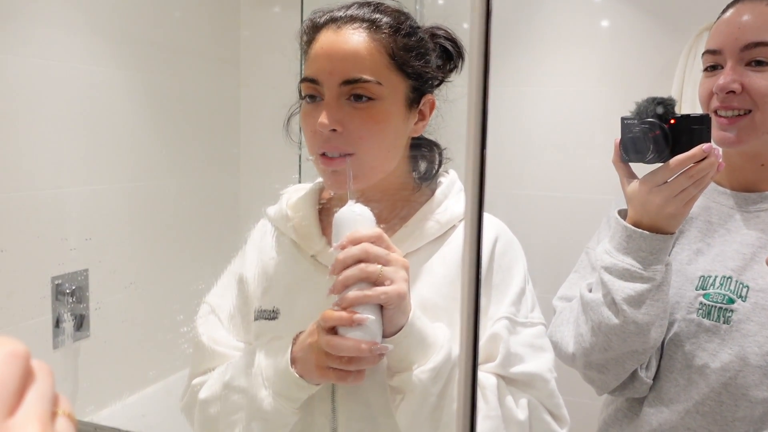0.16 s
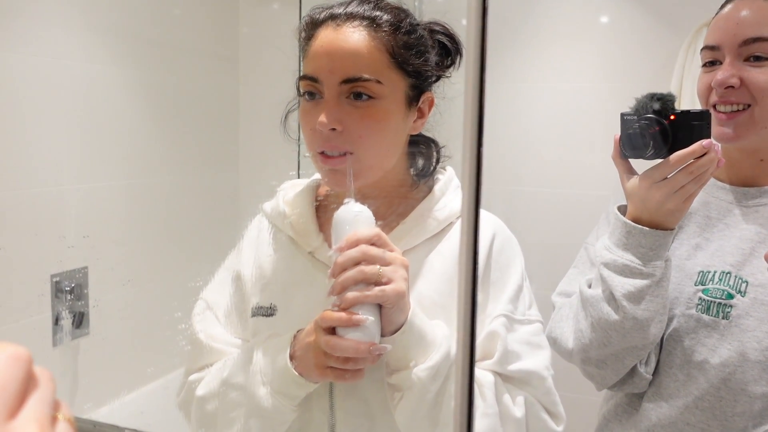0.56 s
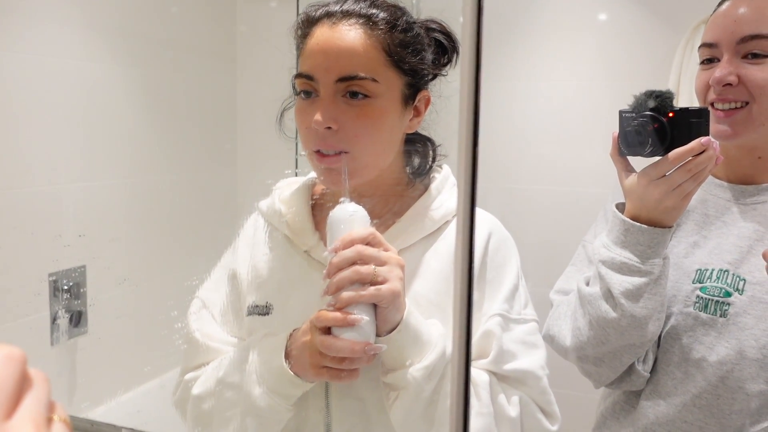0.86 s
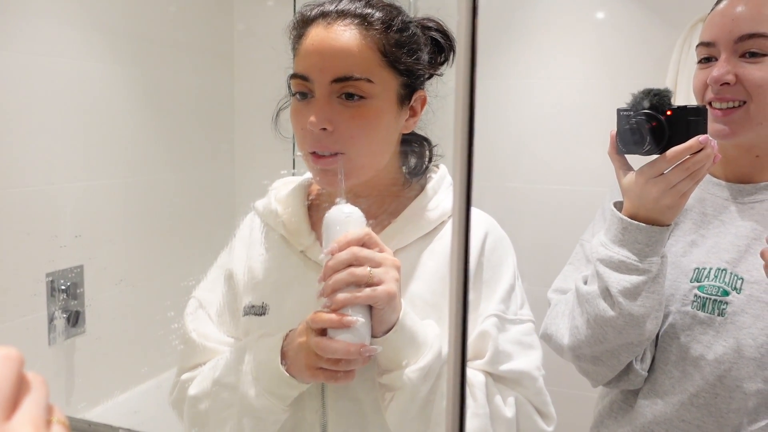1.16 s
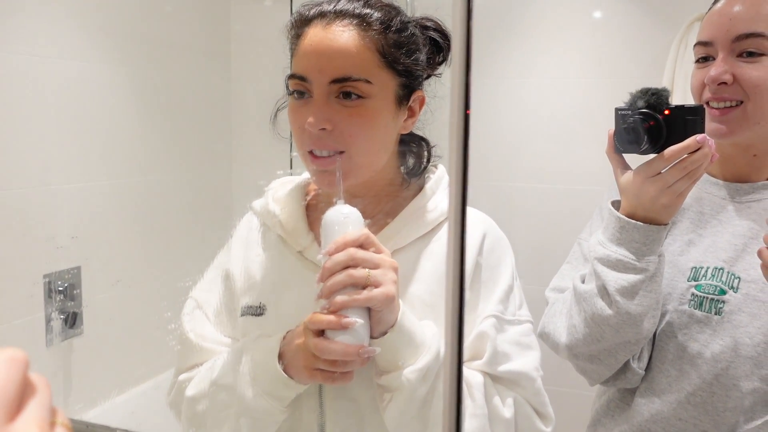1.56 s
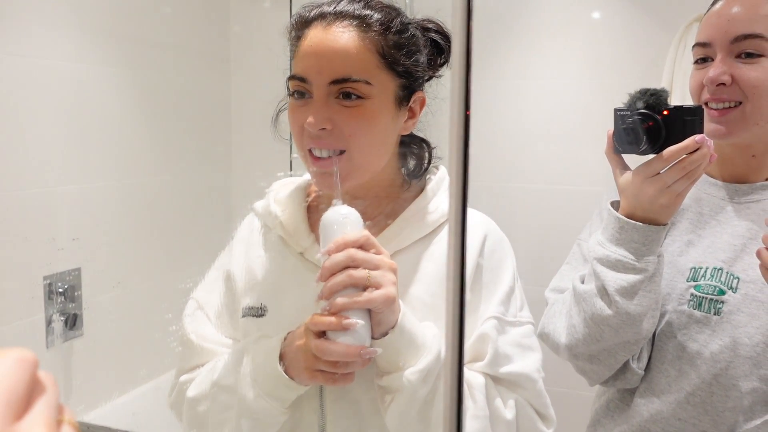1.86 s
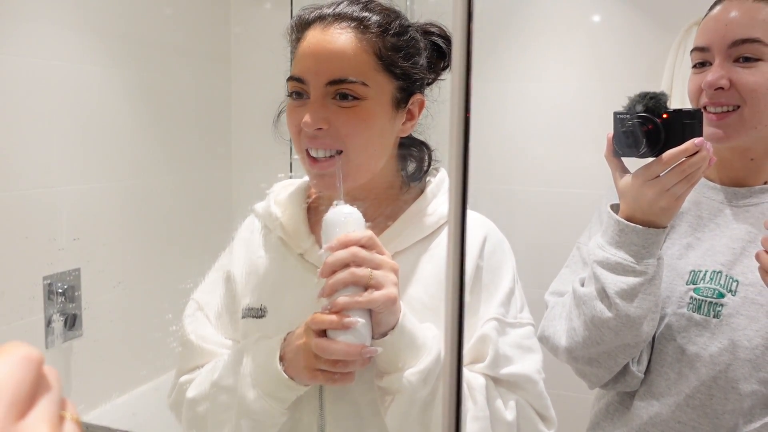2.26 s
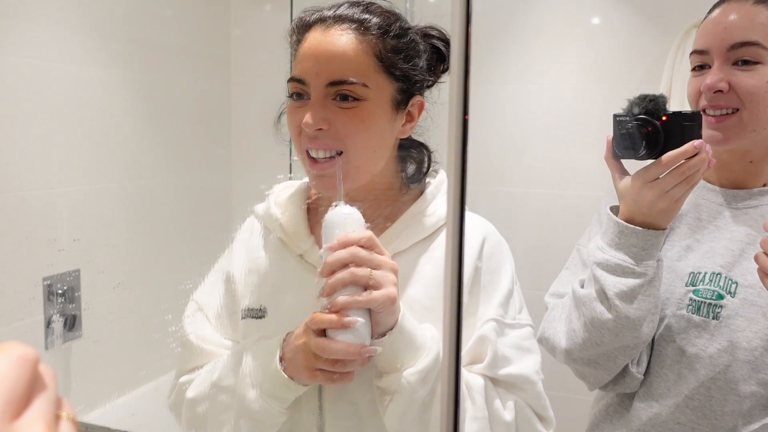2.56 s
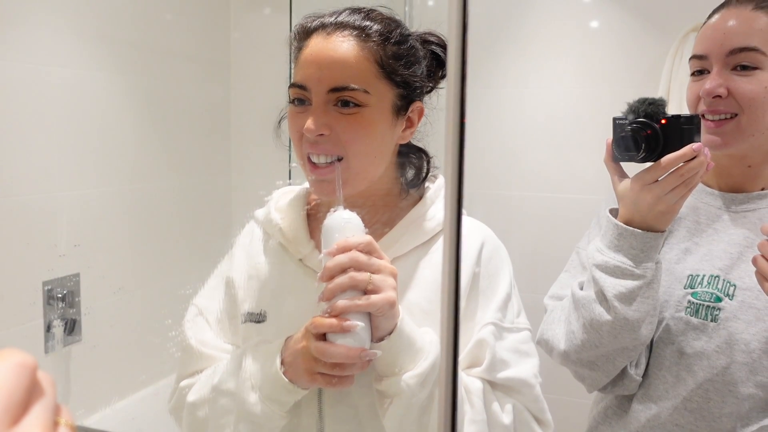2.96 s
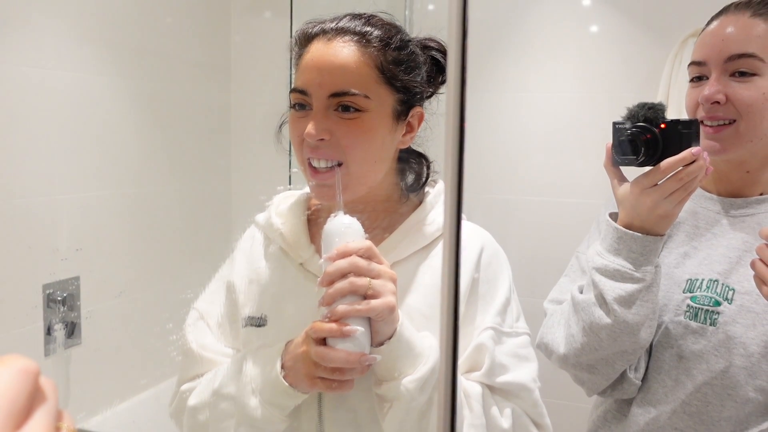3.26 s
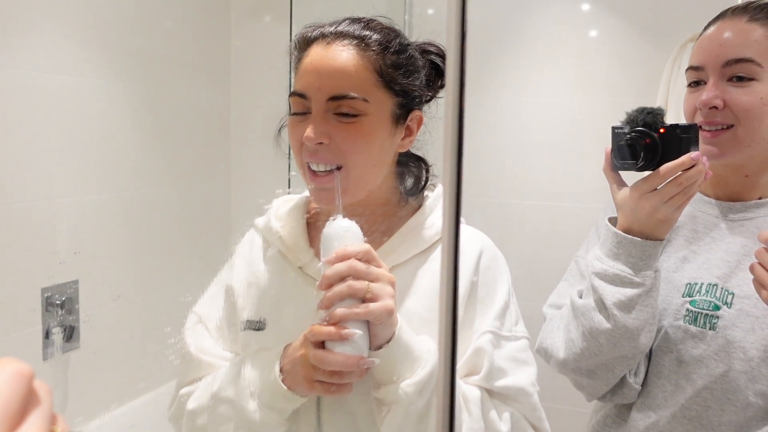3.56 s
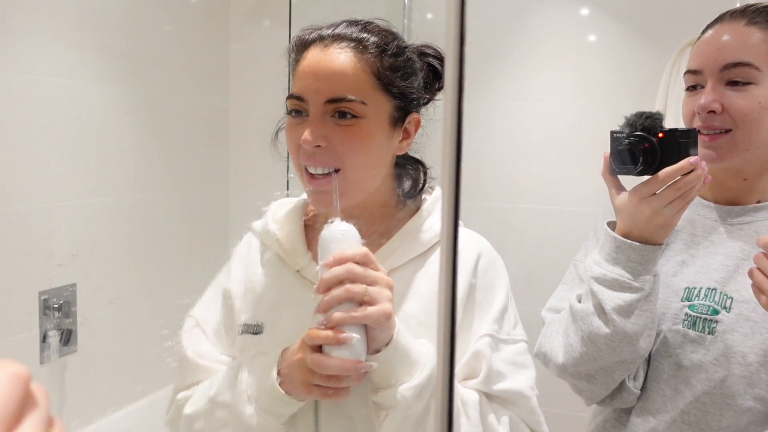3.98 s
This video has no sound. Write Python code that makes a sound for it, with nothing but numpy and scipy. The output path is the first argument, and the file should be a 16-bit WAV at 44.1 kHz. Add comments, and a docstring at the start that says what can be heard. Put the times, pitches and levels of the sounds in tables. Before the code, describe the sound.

Faint room air fills a tiled bathroom. At about 0.2 seconds there is one sharp plastic click with a short ring, followed by a second of quiet. At about 1.2 seconds a cordless water flosser starts and quickly builds to full strength. Around 1.4 seconds its pump gives a very brief high squeal and a first spit of water. From there it runs steadily until the end, just past 4 seconds: the gears rattle the plastic housing and carry a high, warbling whine, swelling with each rapid piston stroke to form a buzz. Beneath this, the pulsing jet hisses against the teeth with a softer hollow slosh in the mouth. Small wet ticks and plops come around 2.2 to 2.6 seconds and again from 3.5 to 4 seconds. Everything is close and almost mono, with a short echo from the tiles.

```python
"""One plastic click, then a cordless water flosser starts up and runs on in a tiled bathroom.
Its pump squeals briefly as water reaches it. The gears whine and rattle the plastic housing,
swelling with each piston stroke, while the pulsing jet hisses and spatters in the mouth.
It all sounds close and almost mono, with a short ring from the tiles over quiet room air."""
import sys
import numpy as np
from scipy import signal
from scipy.fft import rfft, irfft, next_fast_len
from scipy.io import wavfile
from scipy.ndimage import map_coordinates

SR = 44100
rng = np.random.default_rng(int(sys.argv[2]) if len(sys.argv) > 2 else 0)


def pcm_store(signal):
    """Save signal as 16-bit PCM."""
    levels = np.round(np.clip(np.atleast_2d(signal), -1, 1) * 32767)
    wavfile.write(sys.argv[1], SR, levels.astype(np.int16).T)


N = 181824
TIME_S = np.arange(N) / SR
MOTOR_ON_S = 1.22

# The hollow tone of the mouth: pitch_hz, level_db
MOUTH_SPECTRUM = [(50, -73), (200, -37), (400, -20), (500, -11), (600, 4.5), (690, -7), (850, -2.5),
                  (1500, 1), (3000, -24), (8000, -41)]
# The bright hiss of mist and air leaving the tip: pitch_hz, level_db
HISS_SPECTRUM = [(1000, -48), (5500, -3.5), (7000, -2), (8400, 2), (9400, -3), (10700, -3), (13000, -11),
                 (14000, -17), (15800, -18)]


def amp(db):
    """Turn decibels into a gain to multiply by."""
    return 10 ** (np.asarray(db) / 20)


def unit(x):
    """Scale a signal so that its average strength (rms) is 1."""
    return x / np.sqrt(np.mean(x ** 2) + 1e-20)


def along(points, hz):
    """Read between (pitch_hz, value) points on a logarithmic pitch scale."""
    pitches, values = np.transpose(points)
    return np.interp(np.log(hz + 1), np.log(pitches + 1), values)


def curve(points):
    """Join (time_s, value) points with straight lines, one value a sample."""
    times, values = np.transpose(points)
    return np.interp(TIME_S, times, values)


def rise(start_s, settle_s):
    """Stay at 0 until start_s, then climb towards 1, getting 63% of the way in settle_s."""
    return 1 - np.exp(-np.maximum(TIME_S - start_s, 0) / settle_s)


def wobble(per_s):
    """A smooth curve through per_s random values a second."""
    return map_coordinates(rng.standard_normal(2048), [TIME_S * per_s], mode="wrap")


def tone(hz, waver_hz):
    """A pure tone whose pitch trembles quickly."""
    pitch_hz = hz + waver_hz * wobble(300)
    return unit(np.sin(2 * np.pi * np.cumsum(pitch_hz) / SR))


def filtered(x, response):
    """Scale each frequency in x by the gain response(hz)."""
    size = 2 * next_fast_len(N // 2 + SR // 4)
    return irfft(rfft(x, size) * response(np.fft.rfftfreq(size, 1 / SR)), size)[..., :N]


def coloured(x, spectrum, rings=()):
    """Give x a broad tone colour, with narrow peaks and dips (rings) on top."""
    def response(hz):
        rings_db = sum(lift / (1 + (2 * (hz - centre) / width) ** 2) for centre, width, lift in rings)
        cepstrum = irfft(np.log(amp(along(spectrum, hz) + rings_db)))
        half = len(cepstrum) // 2
        # folding the second half away makes the ringing follow each hit, never come before it
        return np.exp(rfft(np.r_[cepstrum[0], 2 * cepstrum[1:half], np.zeros(half)]))
    return filtered(x, response)


def ticks(per_s, spread_db):
    """Tiny impacts of uneven size at random moments."""
    hits = (rng.random(N) < per_s / SR) * rng.choice([-1, 1], N)
    return unit(hits * amp(spread_db * np.clip(rng.standard_normal(N), -2, 2)))


def bursts(starts_s, levels_db, fade_s, attack_s):
    """Short puffs of noise, each dying away by 60 dB in fade_s."""
    out, t = np.zeros(N + SR), np.arange(SR // 10) / SR
    for start_s, db in zip(starts_s, levels_db):
        envelope = amp(db - 60 * t / fade_s) * (1 - np.exp(-t / attack_s))
        out[round(start_s * SR):][:len(t)] += envelope * rng.standard_normal(len(t))
    return out[:N]


def swell(strokes, depth_db, lag, uneven_db):
    """A gain that peaks once a piston stroke, never twice the same; lag is a share of a stroke."""
    pulse_db = depth_db * np.cos(2 * np.pi * (strokes - lag))
    return unit(amp(pulse_db + uneven_db * np.minimum(wobble(55), 1)))


def background(level_db):
    """Quiet room air with a faint hiss."""
    # The broad tone of the air: pitch_hz, level_db
    air_spectrum = [(15, -70), (25, -22.5), (216, -7.5), (333, -11), (392, -14), (557, -11), (1320, -17),
                    (1430, -15), (1730, -18), (1870, -20), (2200, -20.5), (15800, -32.5)]
    # Faint hollow tones of the room: pitch_hz, width_hz, lift_db
    room_rings = [(700, 61, 6.5), (1610, 110, 6.5)]
    # Stereo width of the air, as side level against the middle: pitch_hz, level_db
    air_width = [(40, -11), (130, -9), (300, -8), (700, -3.5), (2000, -3), (8500, -9), (11000, -24)]
    mid, side = coloured(rng.standard_normal((2, N)), air_spectrum, room_rings)
    side = filtered(side, lambda hz: amp(along(air_width, hz)))
    return amp(level_db) * unit(np.array([mid + side, mid - side]))


def bathroom(x, echo_db):
    """Hard tiles add a short, dense stereo echo that shifts as the hand sways."""
    # How long the tiled room takes to die away by 60 dB: pitch_hz, fade_s
    tile_fades = [(200, 0.22), (1500, 0.58), (4000, 0.39), (8000, 0.24), (15000, 0.46)]
    # Stereo width of the echo, as side level against the middle: pitch_hz, level_db
    echo_width = [(300, -6), (600, -16), (1000, -14), (1230, -21.5), (1600, -12), (2400, -23.5),
                  (5000, -15.5), (8000, -58), (14000, -59)]
    hz, t, noise = signal.stft(rng.standard_normal((3, SR // 2)), SR, nperseg=256)
    fading = noise * amp(-60 * t / along(tile_fades, hz)[:, None]) * (1 - np.exp(-t / 0.0026))
    tails = signal.istft(fading, SR, nperseg=256)[1]
    tails /= np.linalg.norm(tails[0])
    here, there, side = amp(echo_db) * signal.fftconvolve(x[None], tails, axes=1)[:, :N]
    sway = 1.228 * TIME_S
    mid = x + np.cos(sway) * here + np.sin(sway) * there
    side = filtered(side, lambda hz: amp(along(echo_width, hz)))
    return np.array([mid + side, mid - side]) / np.sqrt(1 + amp(echo_db) ** 2)


def click():
    """A plastic part snaps home in three quick contacts that ring its shell and the room."""
    # The three contacts: start_s, relative_level_db
    contacts = [(0.1902, -24.5), (0.1919, -25.5), (0.1955, -28)]
    # The broad tone of struck plastic: pitch_hz, level_db
    plastic_spectrum = [(250, -27), (600, -8), (1500, -3.5), (2500, -2.5), (4000, -4), (5200, -2.5),
                        (6500, -8), (9000, -12), (13000, -21), (15800, -27)]
    # Where the part's shell rings: pitch_hz, width_hz, lift_db
    shell_rings = [(680, 160, 6.5), (1520, 200, 6), (2450, 450, 3), (4870, 300, 5), (8600, 400, 2)]
    taps = [bursts([start_s], [db], fade_s=0.0079, attack_s=0.0001) for start_s, db in contacts]
    return sum(bathroom(coloured(tap, plastic_spectrum, shell_rings), echo_db=-2.5) for tap in taps)


def pump_squeal():
    """A brief unsteady tone as water first reaches the pump."""
    start_s, attack_s, hold_s, release_s = 1.405, 0.014, 0.053, 0.022
    corners_s = start_s + np.cumsum([0, attack_s, hold_s, release_s])
    envelope = np.interp(TIME_S, corners_s, [0, 1, 1, 0])
    return amp(-21) * envelope * tone(2075, waver_hz=25.8)


def spits():
    """Pockets of water burst from the mouth, each with a sharp tick and a hollow plop."""
    # Each spit on the teeth and lips: start_s, relative_tick_db, relative_plop_db
    spit_events = [(1.443, -27.5, -28.5), (2.186, -29, -24), (2.271, -26, -25.5), (2.286, -35, -27),
                   (2.56, -36, -30.5), (3.464, -24.5, -25), (3.735, -31.5, -28.5), (3.882, -26.5, -31),
                   (4.048, -25.5, -43)]
    # The tone of the sharp tick: pitch_hz, level_db
    tick_spectrum = [(60, -69), (400, -24), (1400, 9.5), (3000, 7), (5000, 5), (7000, -12), (11000, -16.5),
                     (16000, -39)]
    starts_s, tick_db, plop_db = np.transpose(spit_events)
    spatter = bursts(starts_s, tick_db + 13, fade_s=0.044, attack_s=0.00093)
    plops = bursts(starts_s, plop_db + 16, fade_s=0.057, attack_s=0.002)
    return coloured(spatter, tick_spectrum) + coloured(plops, MOUTH_SPECTRUM)


def trapped_air(pressure):
    """Air left in the tip is driven out first, with a hiss that soon clears."""
    # Where the narrow tip rings: pitch_hz, width_hz, lift_db
    tip_rings = [(8250, 600, 17), (9250, 600, 22)]
    clears_from_s, fade_db_per_s = 1.64, 50
    level_db = -53 - fade_db_per_s * np.maximum(TIME_S - clears_from_s, 0)
    hiss = unit(coloured(rng.standard_normal(N), HISS_SPECTRUM, tip_rings))
    return amp(level_db) * pressure ** 2 * hiss


def mist(flutter, pressure, force_db):
    """Fine, hissing mist forms only as the jet nears full pressure."""
    droplets = ticks(per_s=8200, spread_db=4.5) * flutter
    return amp(-44.5 + 0.53 * force_db) * pressure ** 5.8 * unit(coloured(droplets, HISS_SPECTRUM))


def splash(strokes, force_db):
    """The hollow of the mouth answers with a lower slosh that grows as it fills."""
    slosh = ticks(per_s=1100, spread_db=2.5) * swell(strokes, depth_db=2.3, lag=0, uneven_db=1.0)
    filling = rise(MOTOR_ON_S, settle_s=0.29)
    return amp(-43 + 0.91 * force_db) * filling * unit(coloured(slosh, MOUTH_SPECTRUM))


def jet(flutter, pressure, force_db):
    """Droplets of the jet strike the teeth, so many that they blur into a hiss."""
    # The tone of water hitting teeth: pitch_hz, level_db
    jet_spectrum = [(100, -86), (1500, -36.5), (3000, 2.5), (3500, 1), (4500, -1), (5180, -.5),
                    (5320, -6.5), (6300, -11), (7000, -16.5), (11000, -28.5), (16000, -53)]
    droplets = ticks(per_s=2600, spread_db=4.0) * flutter
    return amp(-28.5 + 1.12 * force_db) * pressure ** 4.3 * unit(coloured(droplets, jet_spectrum))


def gear_whine(strokes):
    """The gears whine once water loads the pump, warbling as each push drags on the motor."""
    # The tones in the whine and when each peaks: pitch_hz, relative_level_db, lag_strokes
    gear_tones = [(1530, 0.5, -0.1), (1205, -19, 0.032), (2265, -6.5, 0.06), (2585, -6, 0.096),
                  (3080, 1.5, -0.08)]
    speed = 1 - 0.022 * np.sin(2 * np.pi * strokes)
    whine = np.zeros(N)
    for hz, db, lag in gear_tones:
        warble = tone(hz * speed, waver_hz=27.32)
        whine += amp(db) * warble * swell(strokes, depth_db=8.0, lag=lag, uneven_db=3)
    return amp(-30.5) * rise(start_s=1.41, settle_s=0.11) * whine


def gear_rattle(strokes, pressure, force_db):
    """Gear teeth rattle the housing, hardest while the piston pushes against the pressure."""
    # The broad tone of the plastic housing: pitch_hz, level_db
    housing_spectrum = [(60, -96), (250, -60.5), (450, -35), (600, -18), (950, -16.5), (1150, -6),
                        (1700, -1.5), (2700, 0), (3180, -1.5), (3300, -13.5), (5150, -11.5), (5400, -22),
                        (7000, -38), (16000, -62)]
    # Its narrow peaks and dips: pitch_hz, width_hz, lift_db
    housing_rings = [(879, 140, 6.5), (1216, 19, 2.5), (1275, 80, 2.5), (1403, 52, -10.5), (1740, 11, -1.5),
                     (1953, 15, -25), (2110, 11, 0.5), (2204, 29, 5), (2210, 38, -1), (2497, 100, 3),
                     (2817, 81, -4.5), (2887, 39, 4), (3000, 40, 2), (3250, 41, -1.5)]
    chatter = ticks(per_s=1600, spread_db=1.5)
    chatter *= swell(strokes, depth_db=4.0, lag=0.04, uneven_db=0.4) ** pressure
    rattle = unit(coloured(chatter, housing_spectrum, housing_rings))
    return amp(-23.5 + 0.99 * force_db) * pressure ** 1.47 * rattle


def flosser():
    """One piston sets the beat for gears and water, which grow louder as the pressure builds."""
    # How fast the piston pumps: time_s, strokes_per_s
    pump_speed = [(1.22, 14.95), (1.33, 27.48), (1.6, 26.78), (1.9, 28.53), (2.6, 28.26), (3.6, 29.04),
                  (4.12, 27.44)]
    # How hard the jet strikes as the tip moves along the teeth: time_s, force_db
    jet_force = [(1.38, 1.2), (1.44, 1.6), (1.49, -1.8), (1.61, 0.5), (1.84, -1.6), (2.04, 1.15),
                 (2.12, -2.1), (2.27, 2), (2.38, -1.1), (2.51, 1.5), (2.74, -1.5), (2.98, 2.5),
                 (3.1, -0.35), (3.25, 1.7), (3.34, -0.6), (3.98, -0.5), (4.04, 2.2), (4.11, -2.5)]
    strokes = np.cumsum(curve(pump_speed) * (TIME_S > MOTOR_ON_S)) / SR  # strokes made so far
    pressure = rise(MOTOR_ON_S, settle_s=0.066)
    force_db = curve(jet_force)
    rattle = gear_rattle(strokes, pressure, force_db)
    whine = gear_whine(strokes)
    valve = amp(1.7 * np.cos(4 * np.pi * strokes))  # peaks twice a stroke, as it opens and shuts
    flutter = valve * swell(strokes, depth_db=1.57, lag=-0.053, uneven_db=2.0)
    water = jet(flutter, pressure, force_db) + splash(strokes, force_db)
    water += mist(flutter, pressure, force_db) + trapped_air(pressure)
    gears = bathroom(rattle, echo_db=-2.5) + bathroom(whine, echo_db=-9.5)
    return gears + bathroom(water, echo_db=-2.5)


def scene():
    """The flosser and its small noises sound in the room, very slightly to the left."""
    near = flosser() + click() + bathroom(pump_squeal() + spits(), echo_db=-6.0)
    return near * amp([[0.12], [-0.12]]) + background(level_db=-62.5)


def record(dry):
    """Thin out the deep bass and cut off the very highest treble."""
    bass_hz, top_hz = 55, 15850
    thinned = signal.sosfilt(signal.butter(2, bass_hz, "highpass", fs=SR, output="sos"), dry)
    return filtered(thinned, lambda hz: hz < top_hz)


dry = scene()
out = record(dry)
pcm_store(out)
```